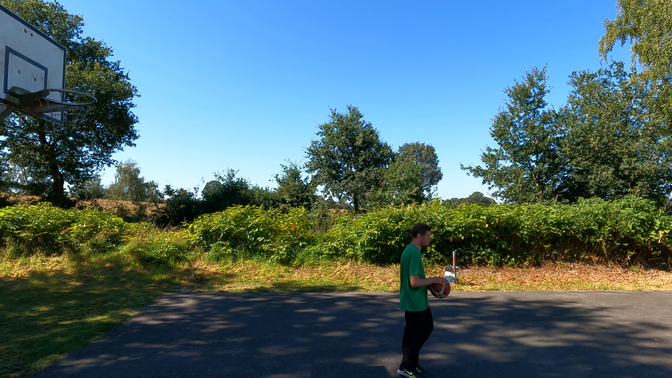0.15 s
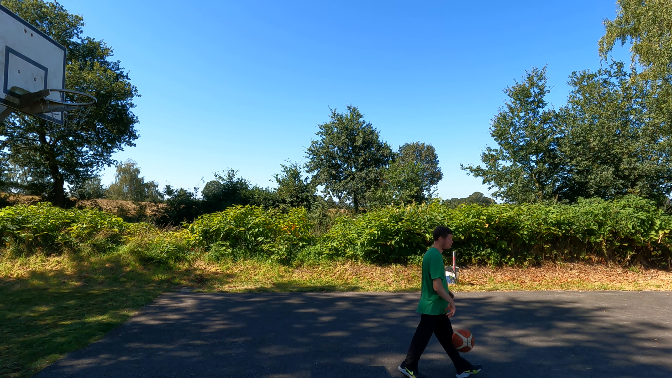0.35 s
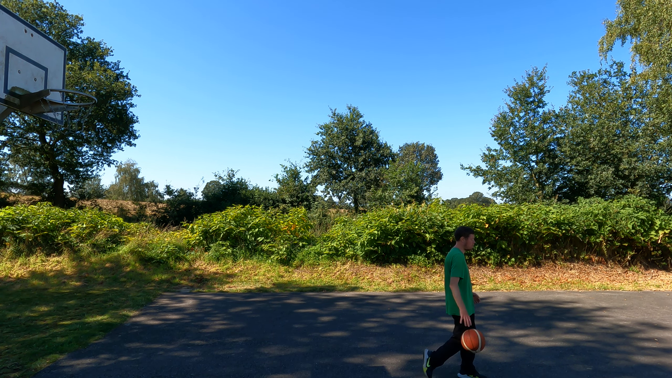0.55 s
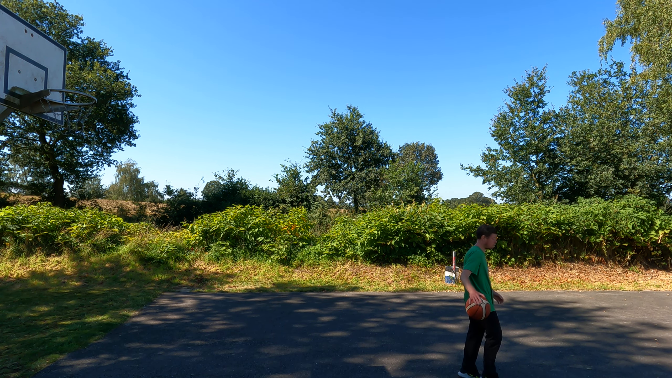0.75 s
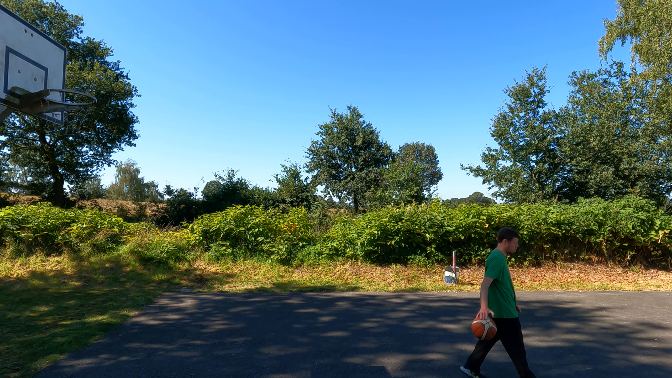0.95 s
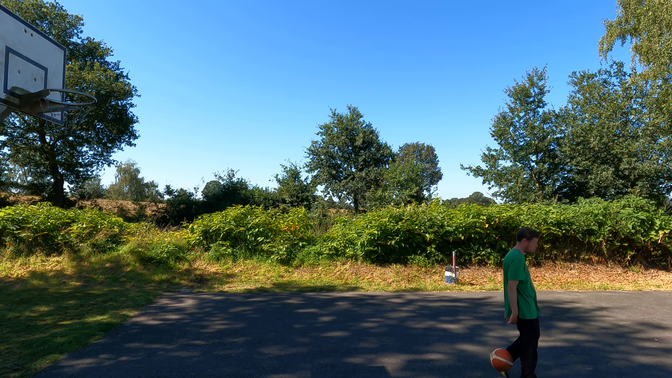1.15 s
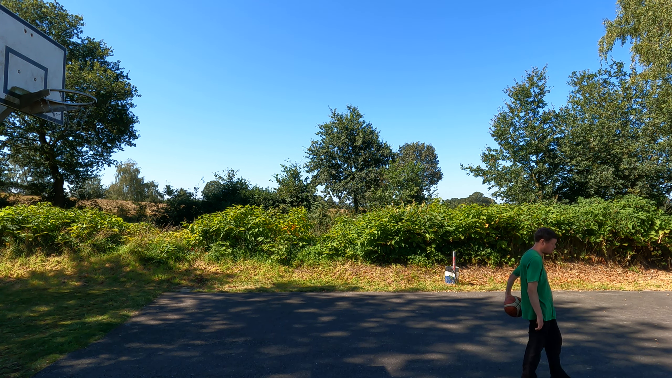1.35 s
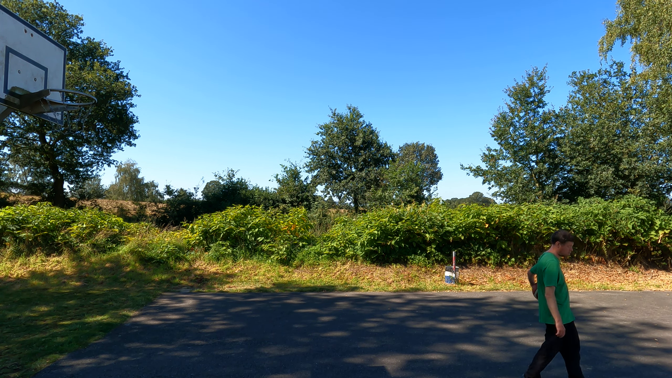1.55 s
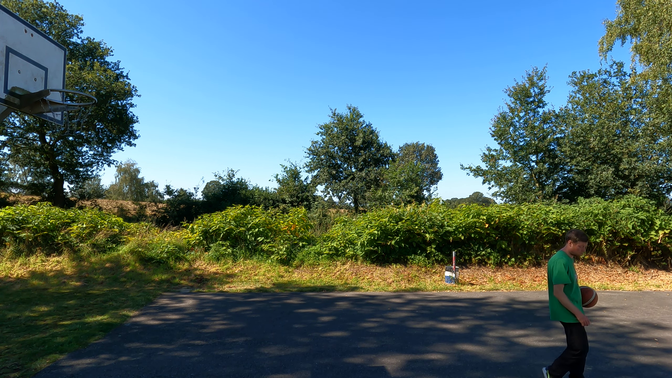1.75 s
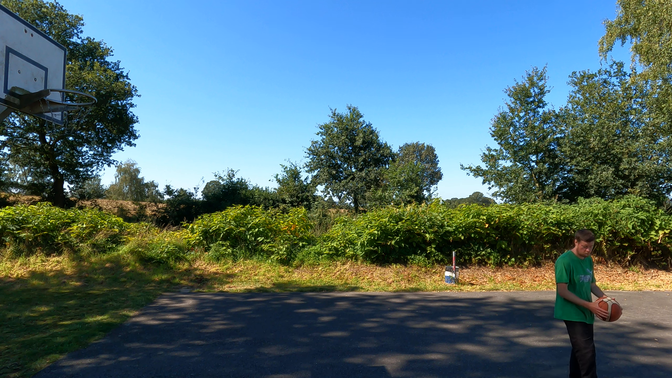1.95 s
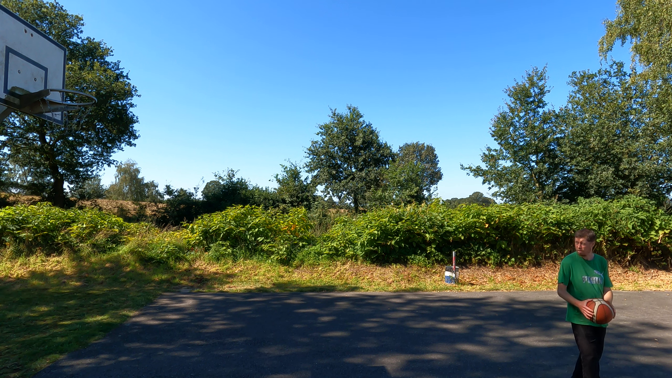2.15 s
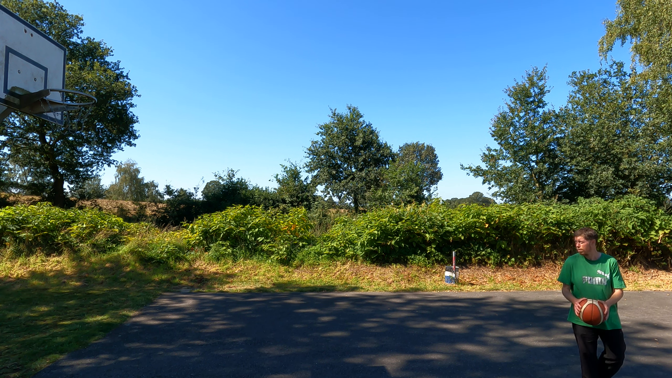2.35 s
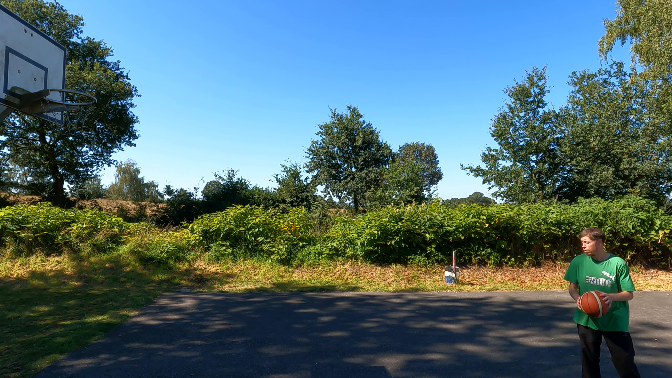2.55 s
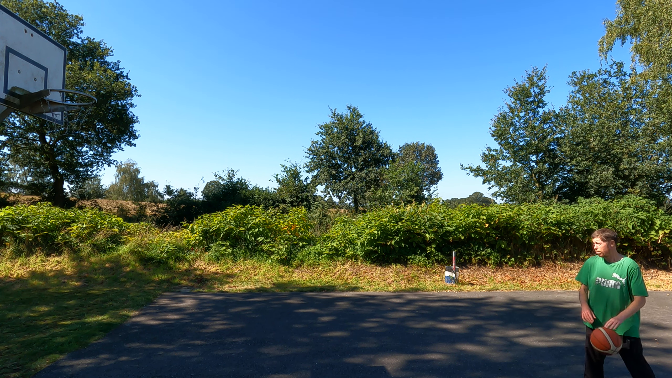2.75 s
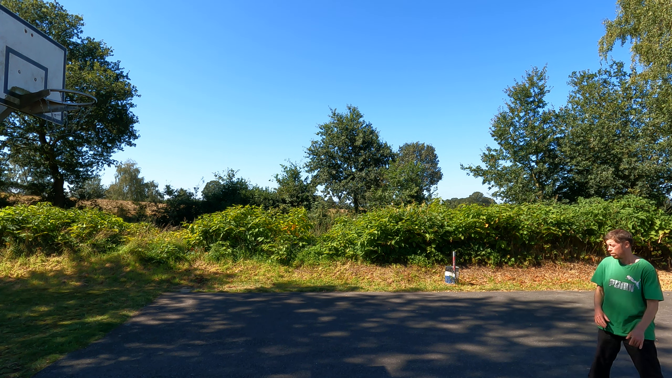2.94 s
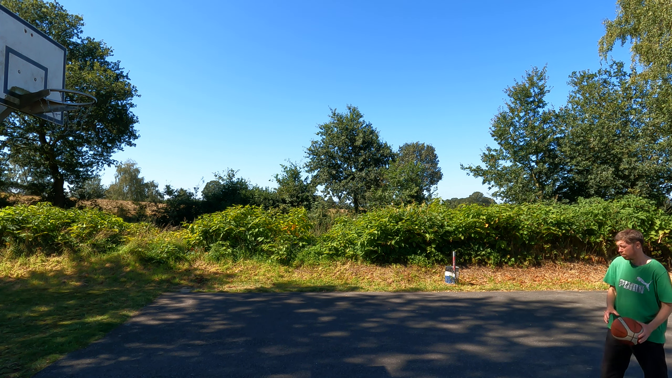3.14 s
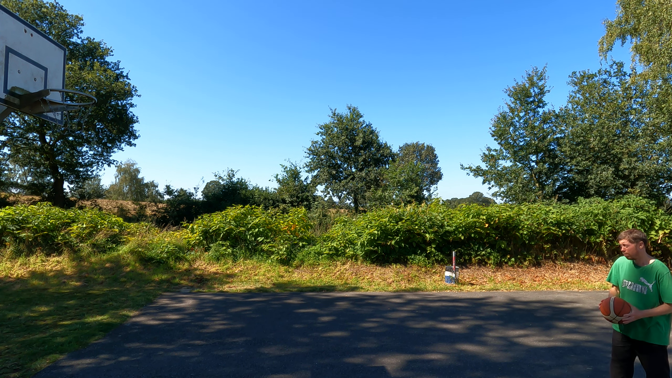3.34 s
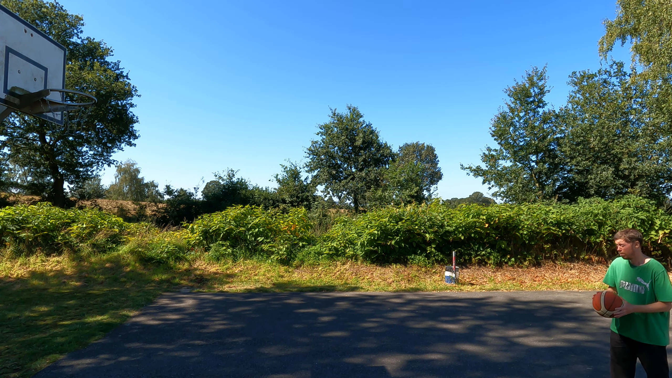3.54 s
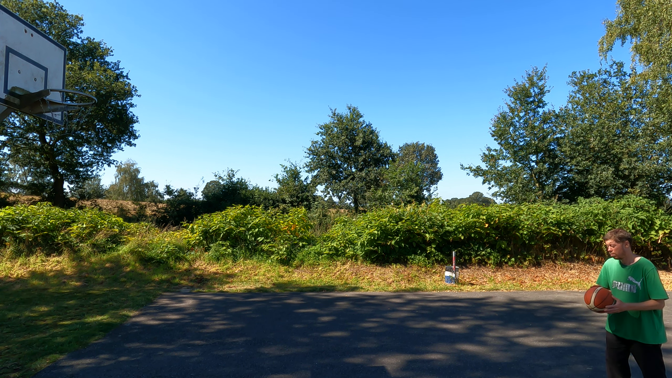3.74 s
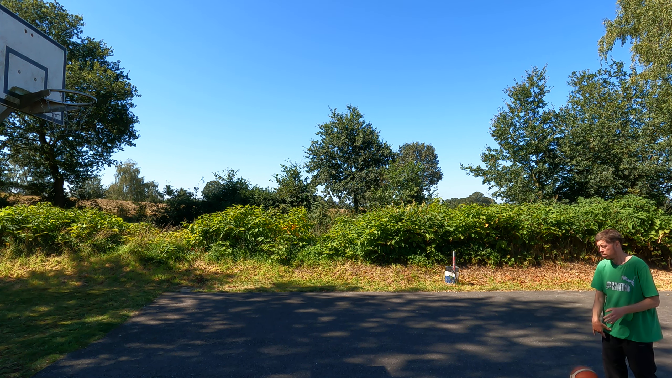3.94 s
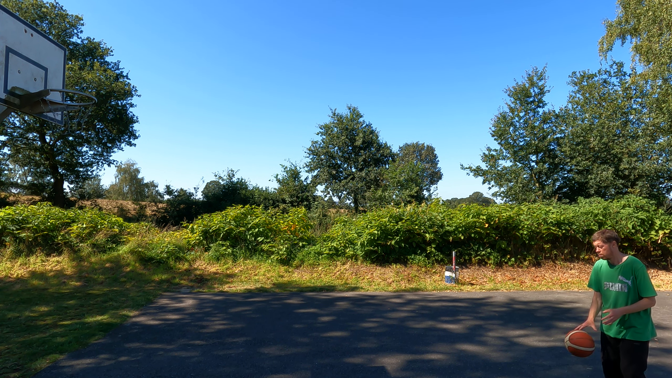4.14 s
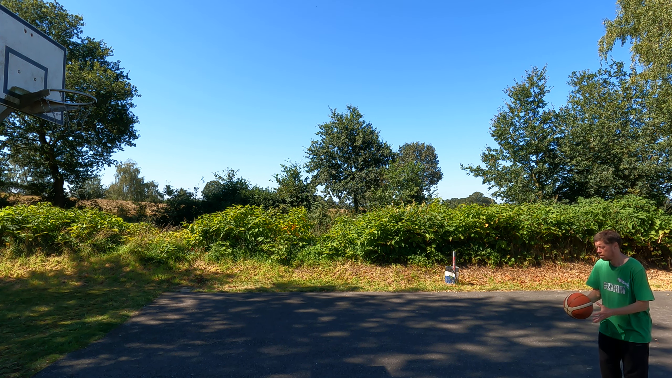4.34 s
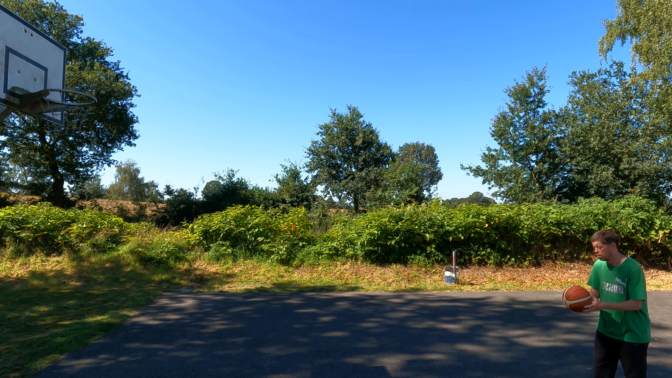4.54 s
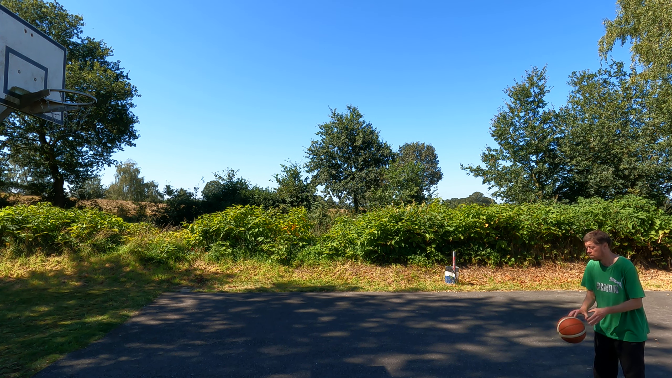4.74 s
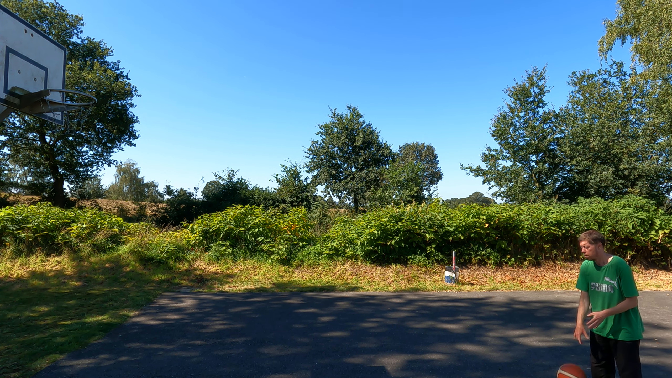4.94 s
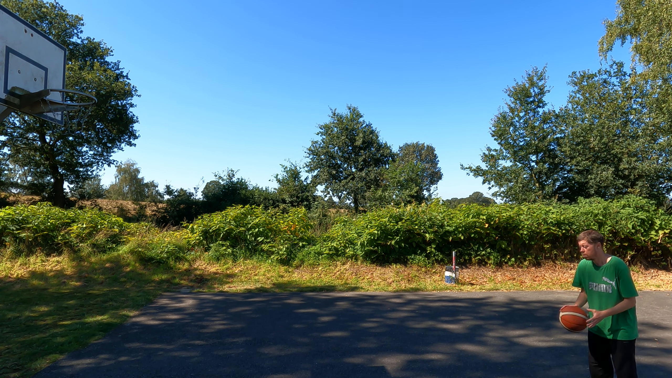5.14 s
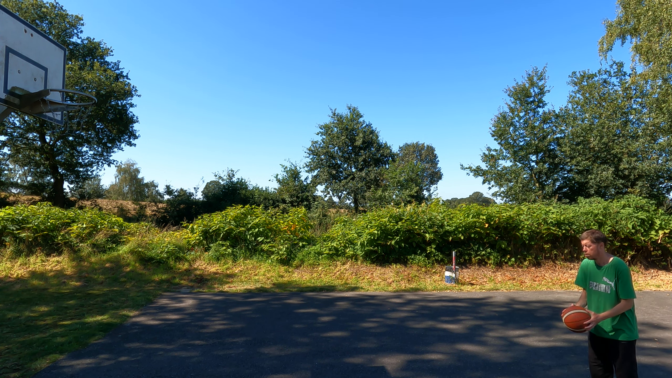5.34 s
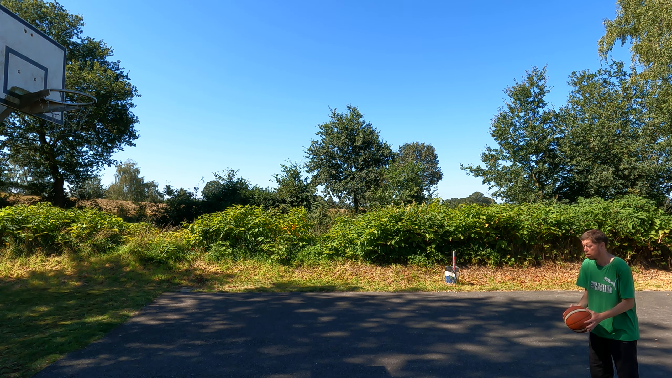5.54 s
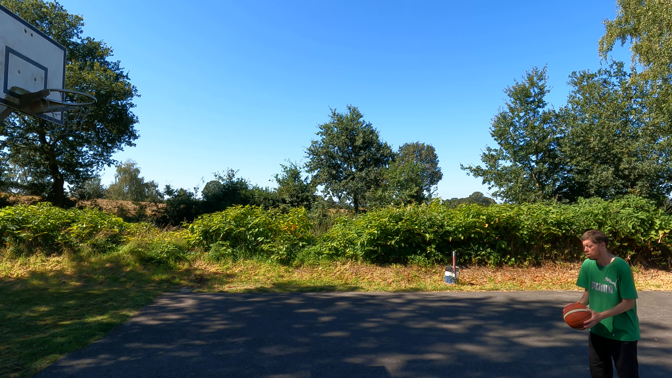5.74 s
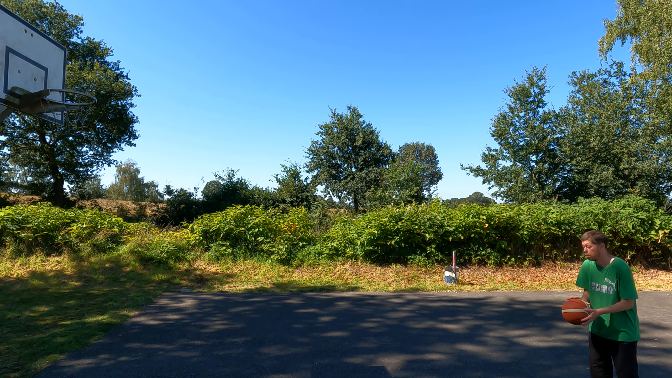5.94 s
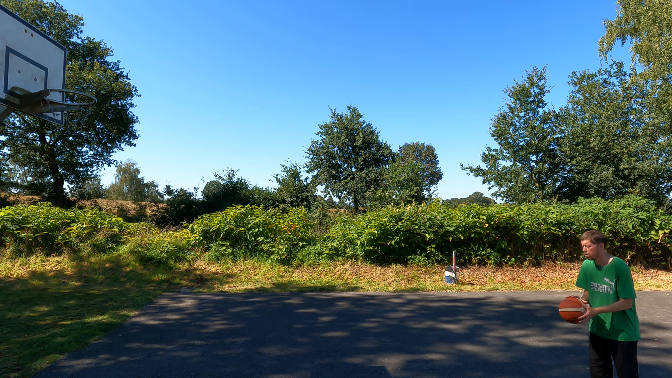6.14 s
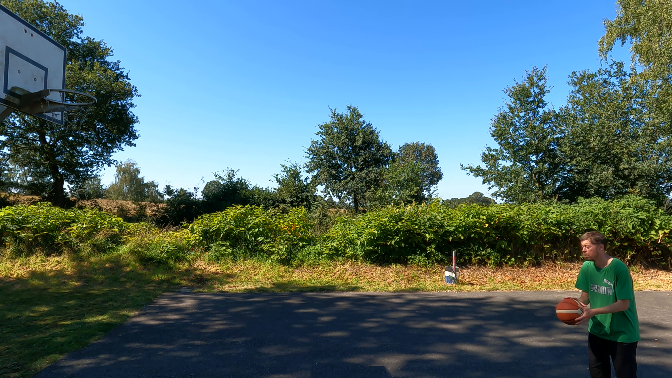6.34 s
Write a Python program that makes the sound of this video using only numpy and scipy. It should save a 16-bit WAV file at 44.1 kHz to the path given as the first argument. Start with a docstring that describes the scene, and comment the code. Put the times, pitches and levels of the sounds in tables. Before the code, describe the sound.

On an outdoor asphalt court, a little to the right of the microphone, a basketball bounces twice among faint footsteps and is caught with a smack of the palms. Three more bounces follow about a second apart. Each is a sharp rubbery slap with a low thump, a ringing ping and a short, soft echo. Hands slide on the ball and clothes rustle faintly over a steady low rumble of distant traffic.

```python
"""An outdoor asphalt court: a little to the right, a basketball is bounced five times, with one smacking
catch after the second bounce. Each bounce is a slap of rubber, a low thump, a brief ring of the skin
and the long ping of the air inside; hedges and trees scatter it back. In between, soles scuff over grit,
palms slide on the ball and clothes rustle, over a low rumble and the hush of far traffic."""
import sys
import numpy as np
from scipy import signal
from scipy.fft import rfft, irfft, next_fast_len
from scipy.io import wavfile
from scipy.ndimage import uniform_filter1d

SR = 44100
rng = np.random.default_rng(int(sys.argv[2]) if len(sys.argv) > 2 else 0)


def digitize_waveform(pressure):
    """Quantize a signal to 16-bit integers and store it at the path in sys.argv[1].

    Rows of a 2-D input are taken as channels; values are limited to [-1, 1].
    """
    field = np.atleast_2d(pressure).T
    bounded = np.clip(field, -1, 1)
    quanta = np.round(bounded * 32767).astype(np.int16)
    wavfile.write(sys.argv[1], SR, quanta)


N = 281799


def amp(db):
    """Decibels to gain."""
    return 10 ** (np.asarray(db) / 20)


def unit_rms(x):
    """Scales to rms 1."""
    return x / np.sqrt(np.mean(x ** 2) + 1e-20)


def curve_at(points, hz):
    """Reads a curve on a log-frequency axis."""
    freqs, values = np.transpose(points)
    return np.interp(np.log(hz + 1), np.log(freqs + 1), values)


def add(mix, start_s, sound):
    """Mixes a sound in at its start time."""
    part = mix[max(round(start_s * SR), 0):][:len(sound)]
    part += sound[:len(part)]


def coloured(x, spectrum):
    """Gives x a spectrum while keeping the power of white noise."""
    gain = amp(curve_at(spectrum, np.fft.rfftfreq(len(x), 1 / SR)))
    return irfft(rfft(x) * unit_rms(gain), len(x))


# Tone of the rumble and traffic bed. Each row: frequency in Hz, relative level in dB.
BED_TONE = [(12, -40), (20, -25.5), (40, -6.5), (61, 2.5), (73, -7), (87, -6.5), (122, -14.5), (179, -20.5),
            (209, -28), (464, -37), (1120, -28.5), (2420, -47), (4610, -58.5), (7330, -60), (9480, -72.5),
            (12300, -100), (20900, -120)]
# Its stereo width. Each row: frequency in Hz, left-right likeness (1 is mono).
BED_LIKENESS = [(60, 0.99), (120, 1), (250, 0.64), (510, 0.64), (1050, 0.84), (2160, 0.14), (4410, 0.35),
                (9030, 0.7)]
# Its pan. Each row: frequency in Hz, left over right in dB.
BED_PAN = [(60, 0), (160, -.5), (450, -4), (1220, -2), (3310, 1), (9030, 2)]
def far_traffic(level_db=-43, drift_db=1.3):
    """Low rumble and the hush of far traffic, drifting in soft patches."""
    hz = np.fft.rfftfreq(4096, 1 / SR)
    a, b, c, d, drift = rng.standard_normal((5, len(hz), N // 1024 + 5))
    drift = uniform_filter1d(drift, size=30, axis=0)  # smooth over frequency, then time
    drift = unit_rms(uniform_filter1d(drift, size=8, axis=1))
    likeness = np.clip(curve_at(BED_LIKENESS, hz), -1, 1)[:, None]
    left = a + 1j * b
    right = likeness * left + np.sqrt(1 - likeness ** 2) * (c + 1j * d)
    spectra = np.array([left, right]) / np.sqrt((1 + likeness) / 2)
    pan_db = curve_at(BED_PAN, hz)[:, None] / 2
    spectra *= amp(curve_at(BED_TONE, hz)[:, None] + drift_db * drift + np.array([pan_db, -pan_db]))
    bed = signal.istft(spectra, nperseg=4096, noverlap=3072)[1][:, :N]
    return amp(level_db) * unit_rms(bed)


def friction(size, clump_db=6.0):
    """Friction noise, bunched into slips of about a millisecond."""
    clumps = unit_rms(uniform_filter1d(rng.standard_normal(size), size=50))
    return unit_rms(rng.standard_normal(size) * amp(clump_db * np.clip(clumps, -2, 2)))


# A scuff's two layers, gritty hiss and dull rub. Each row: frequency in Hz, relative level in dB.
HISS_TONE = [(200, -22), (1500, -10.5), (3000, 11.5), (4800, 4), (7800, 1), (9300, -8.5), (10300, -21),
             (12700, -19), (14500, -39)]
RUB_TONE = [(60, -15), (400, -4), (800, -8), (1250, -3), (1600, 3), (2150, -6), (3200, -9), (4200, -24),
            (10000, -48)]
def scuffs(strokes):
    """Surfaces rub together: each stroke is a swell of hiss and rub."""
    hiss, rub = np.zeros((2, N))
    for start_s, length_s, hiss_db, rub_db in strokes:
        swell = np.sin(np.linspace(0, np.pi, max(int(length_s * SR), 8)))
        add(hiss, start_s, amp(hiss_db) * swell * friction(len(swell)))
        add(rub, start_s, amp(rub_db) * swell * friction(len(swell)))
    return coloured(hiss, HISS_TONE) + coloured(rub, RUB_TONE)


def grit_scuffs(strokes, rub_db=-2.5):
    """Scuffs on grit hiss more than they rub."""
    return scuffs([(start_s, length_s, db, db + rub_db) for start_s, length_s, db in strokes])


# Light footwork. Each row: start in seconds, length in seconds, level in dB.
FOOT_SHUFFLES = [(0, 0.1, -60.5), (1.743, 0.035, -65), (2.829, 0.068, -60), (3.284, 0.12, -69),
                 (4.548, 0.012, -62.5)]
def shuffles():
    """Soles shift lightly on the asphalt."""
    return grit_scuffs(FOOT_SHUFFLES)


def clothes(step_db=-64.5, shuffle_db=-75, hands_db=-74, rise_s=0.046, fall_s=0.25):
    """Cloth rustles: it swells into each move of the feet or palms and dies away after it."""
    t = np.arange(N) / SR
    moves = [(start_s + roll_delay_s, step_db) for start_s, roll_delay_s, *_ in FOOTSTEPS]
    moves += [(start_s, shuffle_db) for start_s, *_ in FOOT_SHUFFLES]
    moves += [(start_s, hands_db) for start_s, *_ in PALM_SLIDES]
    power = np.zeros(N)
    for peak_s, db in moves:
        swell = np.exp(-np.maximum((peak_s - t) / rise_s, (t - peak_s) / fall_s))
        power += (amp(db) * swell) ** 2
    return coloured(np.sqrt(power) * friction(N, clump_db=3.5), HISS_TONE)


# Walking. Each row: heel strike in seconds, then the roll's delay and length in seconds and level in dB.
FOOTSTEPS = [(.345, .103, 0.094, -58.5), (0.887, .075, 0.14, -53)]
def footsteps(heel_s=0.024, heel_db=-49.5, pat_s=0.017, pat_boost_db=7):
    """The heel strikes, then the sole pats down dully and rolls over grit."""
    gritty, pats = [], []
    for start_s, roll_delay_s, roll_s, roll_db in FOOTSTEPS:
        gritty += [(start_s, heel_s, heel_db), (start_s + roll_delay_s, roll_s, roll_db)]
        pats.append((start_s + roll_delay_s, pat_s, roll_db, roll_db + pat_boost_db))
    return grit_scuffs(gritty) + scuffs(pats)


# Small sharp ticks. Each row: start in seconds, hiss level in dB, rub level in dB.
SHARP_TAPS = [(.4305, -44, -40), (2.1848, -50, -55), (3.162, -43.5, -45), (3.2335, -47, -49),
              (6.323, -60, -72)]
def taps(length_s=0.0047):
    """Fingertips and pebbles tap: contacts only milliseconds long."""
    return scuffs([(start_s, length_s, hiss_db, rub_db) for start_s, hiss_db, rub_db in SHARP_TAPS])


def thump(t, start_hz=122, end_hz=78, length_s=0.019):
    """The ball flattens, springs back and overshoots: two low cycles that slow down."""
    progress = np.minimum(t / length_s, 1)
    cycles = np.cumsum(start_hz + (end_hz - start_hz) * progress) / SR
    envelope = abs(np.sin(np.pi * progress ** 1.32)) ** 0.49 * (1 - progress ** 6)
    return -np.sin(2 * np.pi * cycles) * envelope


def dispersed(x, pole=0.845, stages=4):
    """Lows travel more slowly through the skin than highs: a click becomes a quick falling chirp."""
    for _ in range(stages):
        x = signal.lfilter([-pole, 1], [1, -pole], x)
    return x


# Tone of rubber hitting asphalt. Each row: frequency in Hz, level in dB.
SLAP_TONE = [(40, -6), (220, 24.5), (480, 5.5), (750, 15), (1250, 23), (2000, 15.5), (3100, 8.5),
             (3800, -2.5), (5000, -7), (7600, -6), (9000, -12.5), (10200, -31.5), (12500, -28),
             (16000, -68.5)]
def rubber_click(tilt_db, size=2048):
    """The bare impact: the sharpest pulse with this tone, tilted by tilt_db per octave."""
    hz = abs(np.fft.fftfreq(size, 1 / SR))
    log_gain = np.log(amp(curve_at(SLAP_TONE, hz) + tilt_db * np.log2((hz + 100) / 1500)))
    minimum_phase = np.exp(np.conj(signal.hilbert(log_gain)))
    pulse = np.fft.ifft(minimum_phase).real
    return pulse[:size // 2] * signal.windows.tukey(size)[size // 2:]


def slap(t, tilt_db, tick_hz, tick_db=2, crunch_db=-23, peel_db=-40, scatter_db=-54):
    """A hard click, grit crushed under the rubber, a rasp as it peels off, and scatter from the court."""
    crunch = amp(crunch_db) * np.exp(-t / 0.002)
    peel = amp(peel_db) * np.exp(-((t - 0.01194) / 0.0021) ** 2)
    scatter = amp(scatter_db) * np.exp(-t / 0.025)
    impulse = t == 0
    drive = (crunch + peel + scatter) * rng.standard_normal(len(t)) - impulse
    drive += amp(tick_db) * signal.lfilter(*signal.iirpeak(tick_hz, Q=4, fs=SR), drive)
    return signal.fftconvolve(dispersed(drive), rubber_click(tilt_db))[:len(t)]


def knock(t, hz, db, t60=0.054):
    """A hollow note that depends on which panel is hit; it starts inward like the slap."""
    return -amp(db - 60 * t / t60) * np.sin(2 * np.pi * hz * t)


# The skin's damped modes. Each row: frequency in Hz before detuning, level in dB, 60 dB decay in seconds.
SKIN_MODES = [(226, -17, 0.075), (427, -34.5, 0.091), (687, -27.5, 0.06), (1350, -36.5, 0.022),
              (1644, -29, 0.069), (1904, -33, 0.083), (2626, -43, 0.12)]
def skin_ring(t, note_hz, ring_db, modes_db, note_db=-20.5, lift_db=-22, note_t60=0.018):
    """The skin rings briefly, is choked by the contact and sounds again on lift-off."""
    choke = np.exp(-((t - 0.007) / 0.0015) ** 2)
    lift_off = np.exp(-((t - 0.015) / 0.0045) ** 2)
    envelope = amp(note_db - 60 * t / note_t60) + amp(lift_db) * lift_off
    note = envelope * np.sin(2 * np.pi * note_hz * t)
    modes = sum(amp(db - 60 * t / t60) * np.sin(2 * np.pi * hz * rng.uniform(0.76, 1.02) * t)
                for hz, db, t60 in SKIN_MODES)
    return amp(ring_db) * note + amp(modes_db) * modes * (1 - choke / 2 + 1.86 * lift_off)


# Pings of the air in the ball. Each row: frequency in Hz, level in dB, 60 dB decay in seconds.
AIR_MODES = [(1003, -56, .3), (1610, -62, .35), (2159, -48, .9), (2197, -55, .5), (2700, -70, .5),
             (2852, -46, .8), (3220, -76, .6), (3494, -76, .7), (4113, -82, .6), (4414, -63, .85)]
def air_ping(low_db, high_db, spin_hz, spin_s, split_hz=2500):
    """The enclosed air pings; its lobes sweep past as the ball spins and stand still once it is held."""
    t = np.arange(SR) / SR
    angle = 2 * np.pi * spin_hz * np.minimum(t - spin_s, 0)
    swell = 1 - 0.75 * np.exp(-(t / 0.19) ** 2)  # the ball rises from the ground
    ping = np.zeros(SR)
    for hz, db, t60 in AIR_MODES:
        lobes = np.cos(angle + rng.uniform(-0.3, 0.3)) + 0.15j  # the dips never reach silence
        level_db = db + (low_db if hz < split_hz else high_db) - 60 * t / t60
        ping += amp(level_db) * (lobes * np.exp(2j * np.pi * hz * t)).imag
    return swell * ping


def returning_shock(t, db=-17, delay_s=0.00366, width_s=0.00034):
    """The shock runs round the ball and comes back as one dull pulse."""
    return -amp(db) * np.exp(-((t - delay_s) / width_s) ** 2)


# Tone of the echo from hedges and trees. Each row: frequency in Hz, level in dB.
FOLIAGE_TONE = [(40, -17), (100, 13.5), (250, -7.5), (550, -9), (1100, 0), (2000, -5.5), (3000, -7.5),
                (4200, -17.5), (7600, -27.5), (9000, -39.5), (10200, -51), (12500, -54), (15000, -68)]
# Its tail. Each row: frequency in Hz, 60 dB decay in seconds.
FOLIAGE_DECAY = [(100, 1), (1000, 0.72), (3000, .7), (6000, 0.95), (11000, 0.64)]
def foliage_echo(start_s, level_db, swell_s=0.036, side_db=-3, reflections_per_s=3500):
    """Countless weak reflections build up in stereo as a blow reaches the foliage."""
    reflections = rng.standard_normal((2, SR)) * (rng.random((2, SR)) < reflections_per_s / SR)
    hz, t, spectra = signal.stft(reflections, SR, nperseg=256)
    swell = 1 - np.exp(-(t / swell_s) ** 2)
    shape = swell * amp(-60 * t / curve_at(FOLIAGE_DECAY, hz)[:, None])
    shape *= amp(curve_at(FOLIAGE_TONE, hz))[:, None] / np.sqrt(np.mean(shape ** 2, 1, keepdims=True))
    mid, side = signal.istft(spectra * shape, SR, nperseg=256)[1] / np.linalg.norm(reflections[0])
    echo = np.zeros((2, N))
    add(echo[0], start_s, mid + amp(side_db) * side)
    add(echo[1], start_s, mid - amp(side_db) * side)
    return amp(level_db) * echo


# The dribble. Each row: start in seconds, force in dB, brightness in dB per octave, grit tick in Hz,
# knock in Hz, skin note in Hz, ring in dB, echo in dB, low pings in dB, high pings in dB,
# spin rate in Hz, spin time in seconds.
BALL_BOUNCES = [(0.6004, -1.5, -1.5, 8150, 1224, 900, -5, -3, 5.5, 7, 4.4, 0.23),
                (1.2658, -5, 1.3, 5550, 1205, 913, 2, -3.5, -1.5, -2, 5.2, 0.23),
                (3.0600, -1, -1.5, 4330, 1284, 1010, -13, -1, 1, 1.5, 4.3, 0.14),
                (4.1573, -1, -1.5, 7700, 716, 1013, -3.5, 1.5, -2, 11.5, 5.06, 0.3),
                (5.0466, 0, -2, 7050, 730, 1110, 1, -1.5, 10.5, 2, 7, 0.24)]
def bounces(thump_db=-9, knock_db=-20.5):
    """The ball hits the asphalt and its skin and air ring; returns the direct sound and the echo."""
    t = np.arange(SR // 10) / SR
    direct, echo = np.zeros(N), np.zeros((2, N))
    for start_s, force_db, tilt_db, tick_hz, knock_hz, note_hz, ring_db, echo_db, *ping in BALL_BOUNCES:
        blow = amp(force_db) * (slap(t, tilt_db, tick_hz) + returning_shock(t))
        blow += amp(thump_db + 0.25 * force_db) * thump(t)  # grows far less with force than the slap
        blow += knock(t, knock_hz, knock_db + ring_db)
        blow += skin_ring(t, note_hz, ring_db, modes_db=force_db - 1.5)
        add(direct, start_s, blow)
        add(direct, start_s, air_ping(*ping))
        echo += foliage_echo(start_s, echo_db)
    return direct, echo


def grit_spray(delay_s=0.038, length_s=0.075, db=-60):
    """Each bounce throws up grit that patters back down."""
    return grit_scuffs([(start_s + delay_s, length_s, db) for start_s, *_ in BALL_BOUNCES])


# Handling the ball. Each row: start in seconds, length in seconds, rub level in dB.
PALM_SLIDES = [(0.946, 0.029, -42), (1.537, 0.092, -58), (2.138, 0.06, -51), (3.212, 0.021, -48),
               (4.215, 0.086, -53.5), (4.313, 0.061, -48.5)]
def palms(hiss_db=-3, full_slide_s=0.067, hiss_db_per_doubling=17):
    """Palms slide on the ball, more rub than hiss; a touch shorter than a full slide is duller still."""
    strokes = []
    for start_s, length_s, db in PALM_SLIDES:
        dulling_db = hiss_db_per_doubling * np.log2(min(length_s / full_slide_s, 1))
        strokes.append((start_s, length_s, db + hiss_db + dulling_db, db))
    return scuffs(strokes)


def catch(start_s=2.081, rub_db=-28, hiss_db=-44, thump_db=-26, second_delay_s=0.026, second_db=-17.5):
    """One palm smacks the ball with a cupped note, the other closes softly; returns direct and echo."""
    t = np.arange(SR // 10) / SR
    smack = np.minimum(t / 0.0012, 1) * np.exp(-t / 0.0055)
    palm = coloured(amp(rub_db) * smack * friction(len(t)), RUB_TONE)
    palm += coloured(amp(hiss_db) * smack * friction(len(t)), HISS_TONE)
    palm += knock(t, hz=1113, db=-21.5, t60=0.036) + knock(t, hz=413, db=-31, t60=0.048)
    palm += amp(thump_db) * thump(t, start_hz=167, end_hz=111, length_s=0.013)
    direct = np.zeros(N)
    add(direct, start_s, palm)
    add(direct, start_s + second_delay_s, amp(second_db) * palm)
    return direct, foliage_echo(start_s, level_db=-16)


# Shadow on the left microphone. Each row: frequency in Hz, level against the right in dB.
LEFT_SHADE = [(100, 0), (180, -.8), (320, -2), (560, -4), (1000, -4.6), (3000, -5.2), (5200, -2.2),
              (9000, -.5)]
# Its lag. Each row: frequency in Hz, phase against the right in radians.
LEFT_PHASE = [(40, 0), (150, -.07), (300, -.2), (1000, -.58), (2400, -1.05), (3360, -1.8), (3700, -3.1),
              (4050, -5.2), (4480, -6), (7300, -6.4), (9200, -6.25)]
def from_the_right(x):
    """The body that houses the microphones shades and delays the left one for a sound from the right."""
    size = next_fast_len(N + SR // 10)
    hz = np.fft.rfftfreq(size, 1 / SR)
    response = amp(curve_at(LEFT_SHADE, hz)) * np.exp(1j * curve_at(LEFT_PHASE, hz))
    left = irfft(rfft(x, size) * response, size)[:N]
    return np.array([left, x])


def scene():
    """Player and ball to the right, with the echo and far traffic all around."""
    bed = far_traffic()
    bounced, bounce_echo = bounces()
    caught, catch_echo = catch()
    player = shuffles() + clothes() + footsteps() + taps() + palms()
    return from_the_right(player + bounced + grit_spray() + caught) + bounce_echo + catch_echo + bed


def record(dry, cutoff_hz=14800):
    """A steep low-pass takes off the very top of the treble."""
    lowpass = signal.firwin(255, cutoff_hz, window=("kaiser", 9), fs=SR)
    return signal.oaconvolve(dry, lowpass[None], "same")


dry = scene()
out = record(dry)
digitize_waveform(out)
```